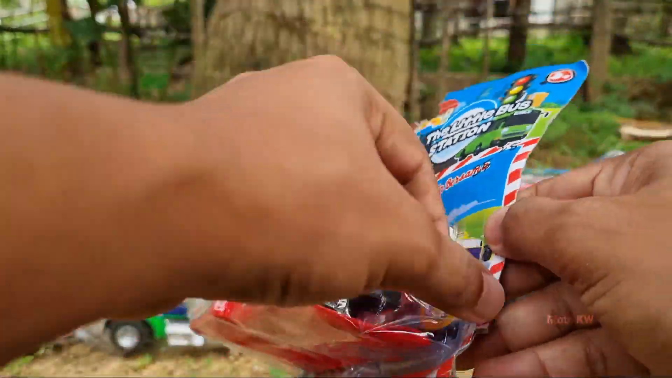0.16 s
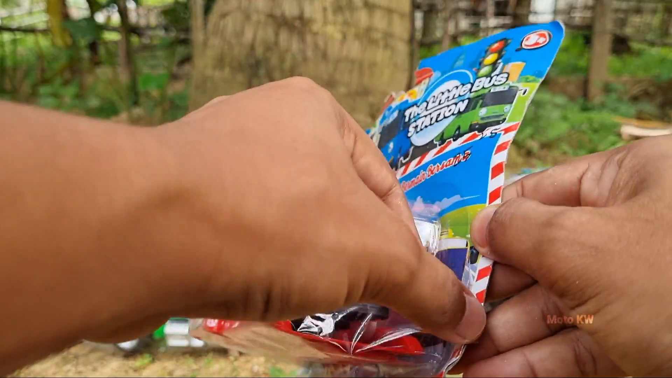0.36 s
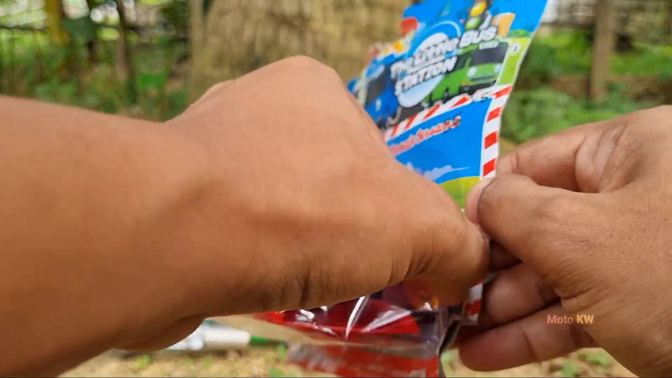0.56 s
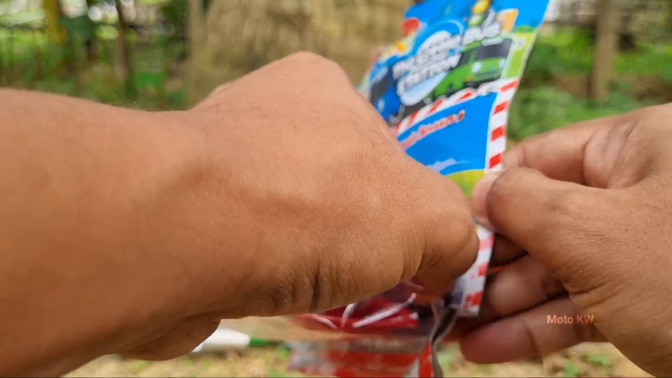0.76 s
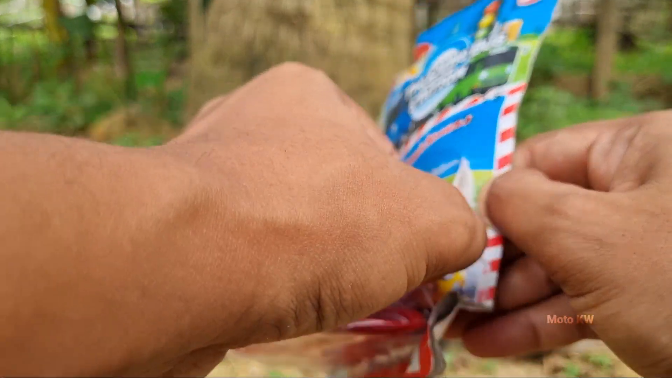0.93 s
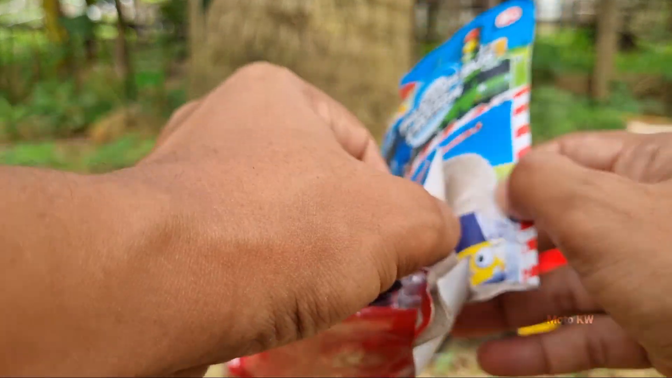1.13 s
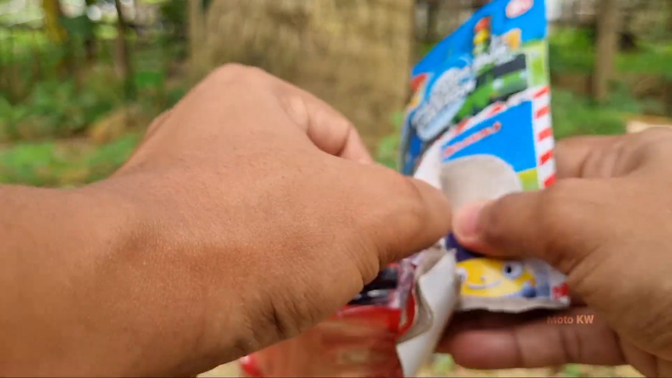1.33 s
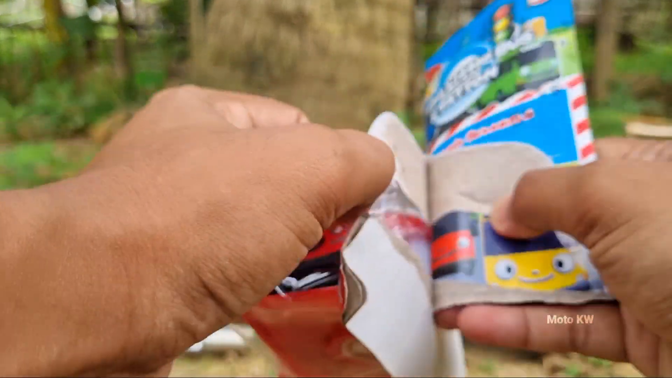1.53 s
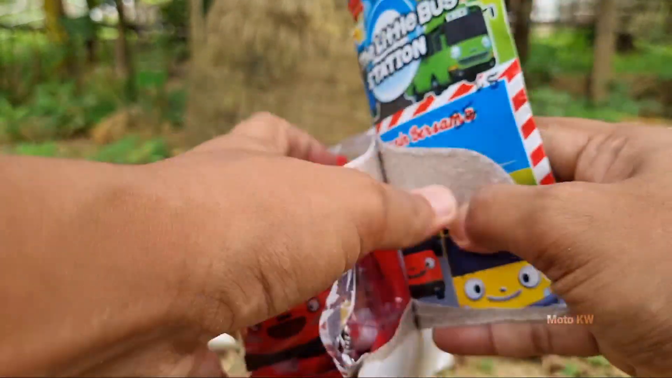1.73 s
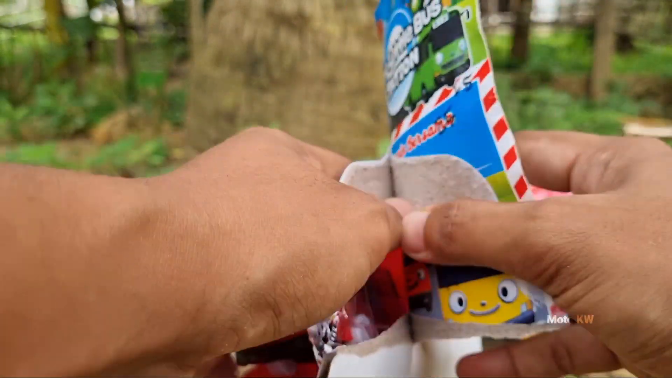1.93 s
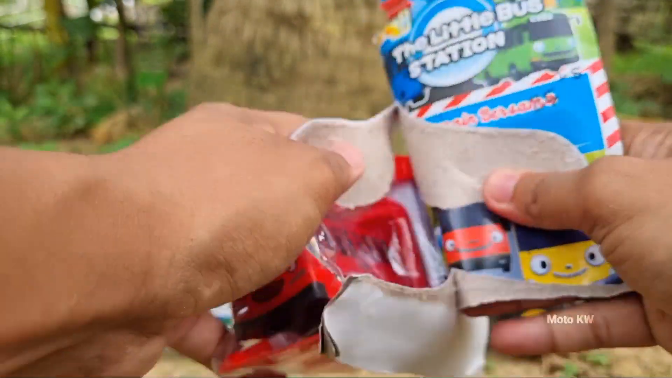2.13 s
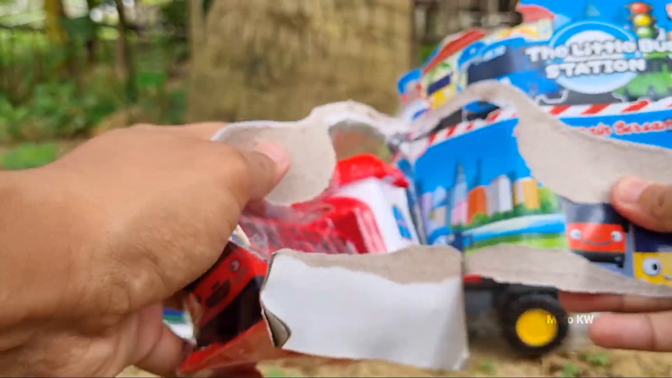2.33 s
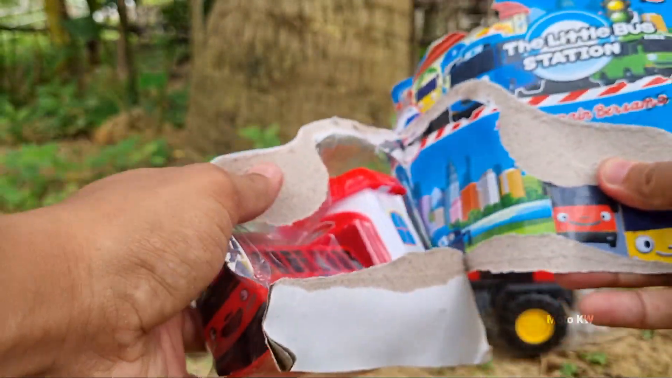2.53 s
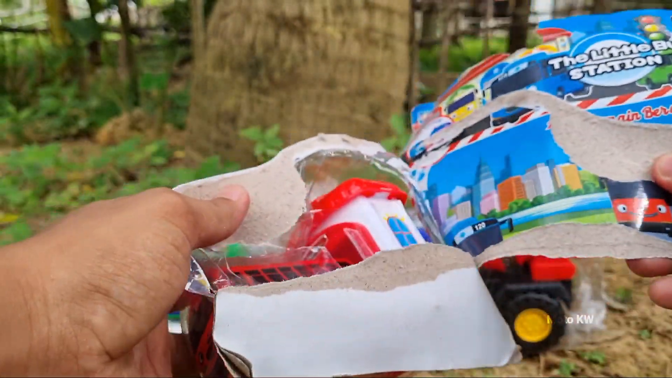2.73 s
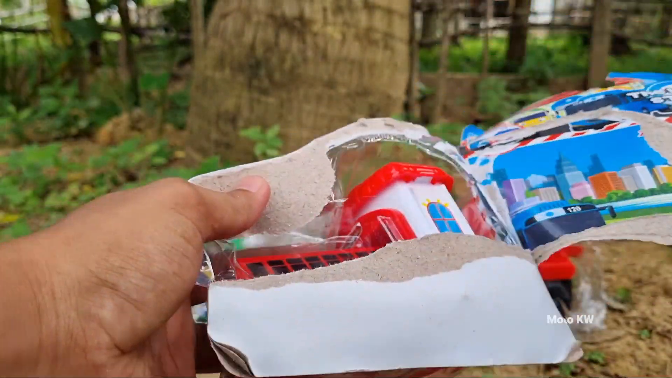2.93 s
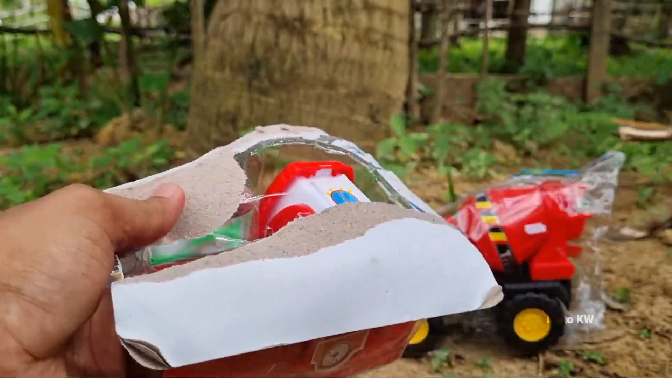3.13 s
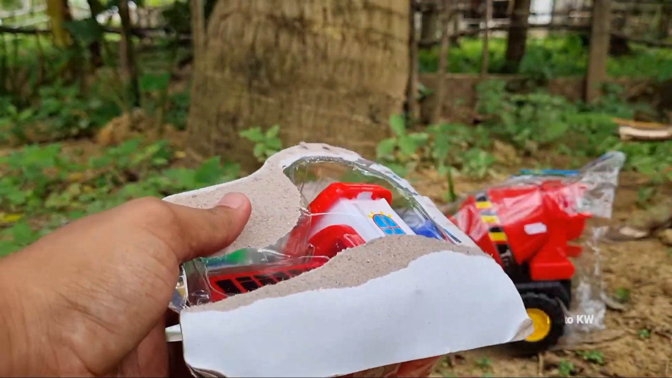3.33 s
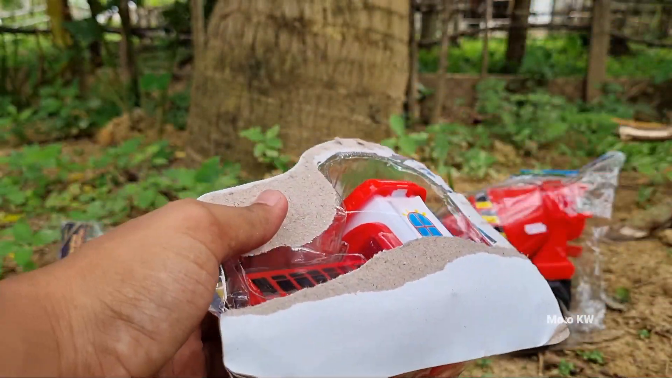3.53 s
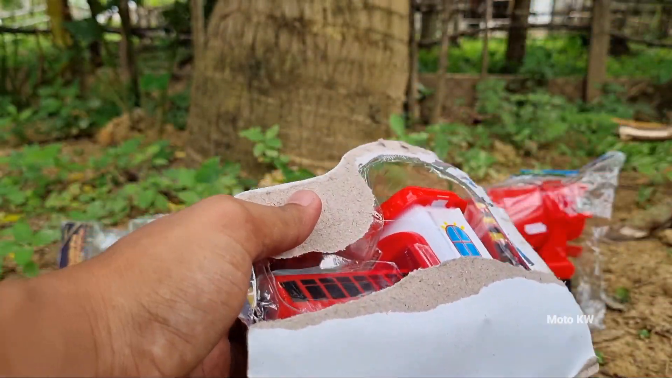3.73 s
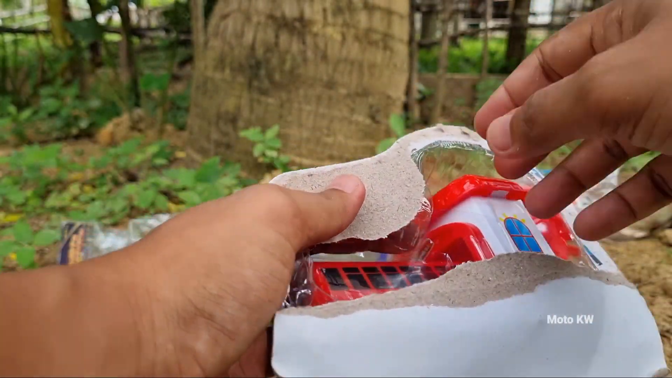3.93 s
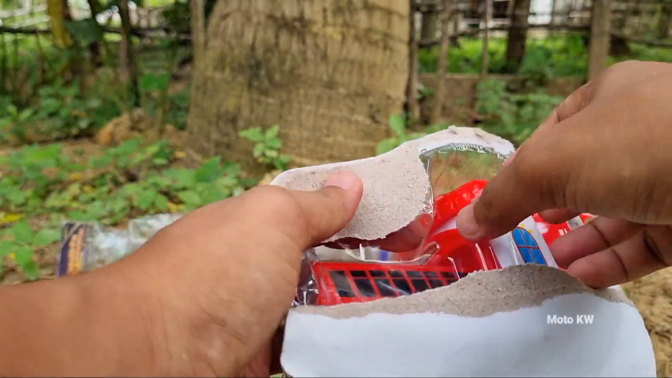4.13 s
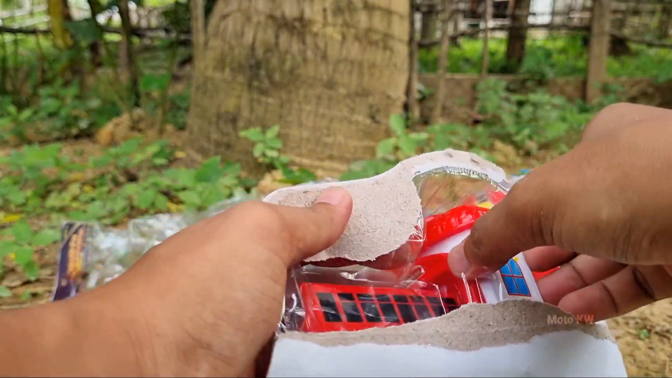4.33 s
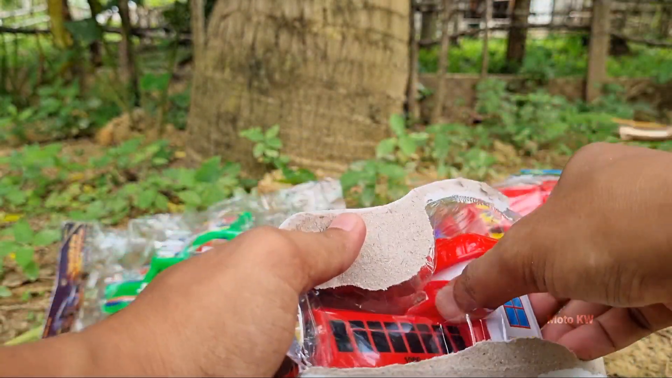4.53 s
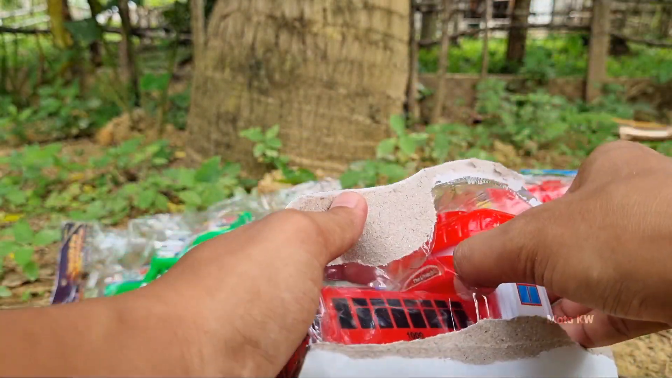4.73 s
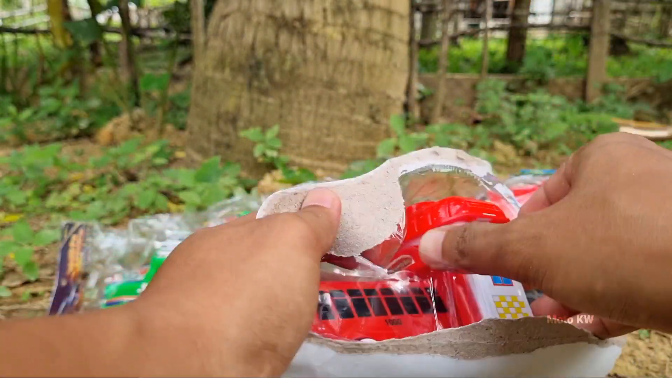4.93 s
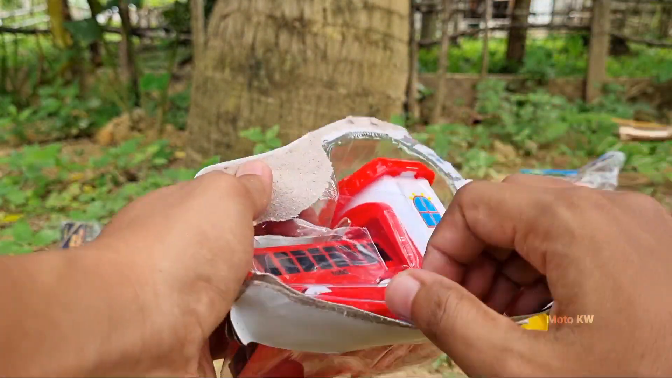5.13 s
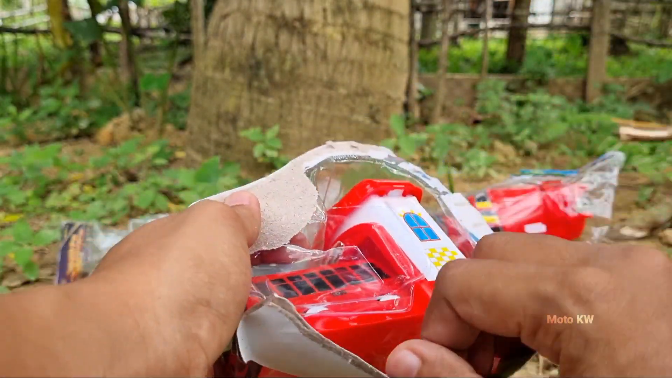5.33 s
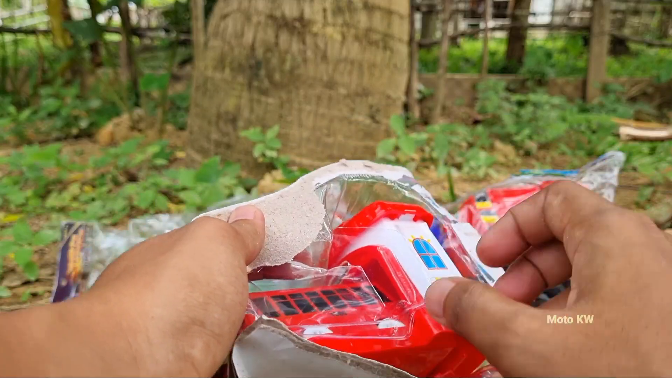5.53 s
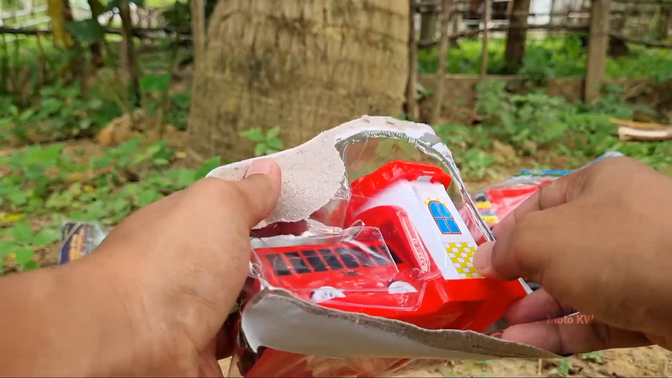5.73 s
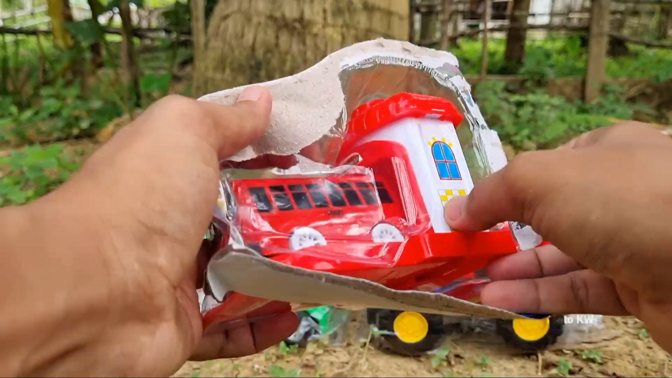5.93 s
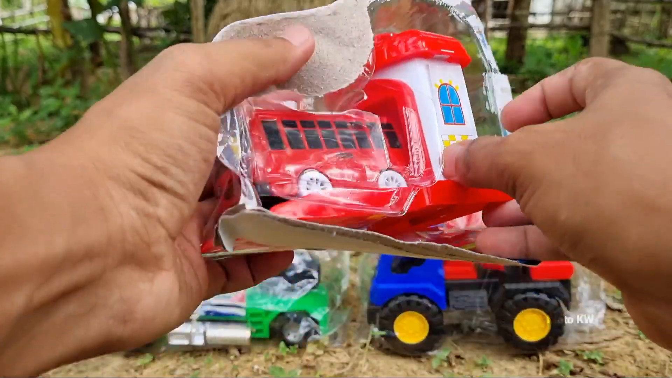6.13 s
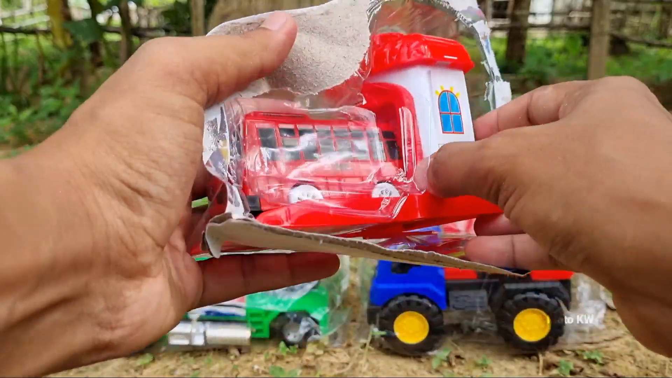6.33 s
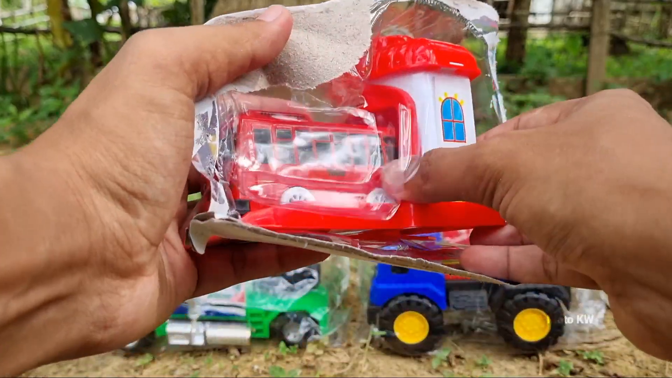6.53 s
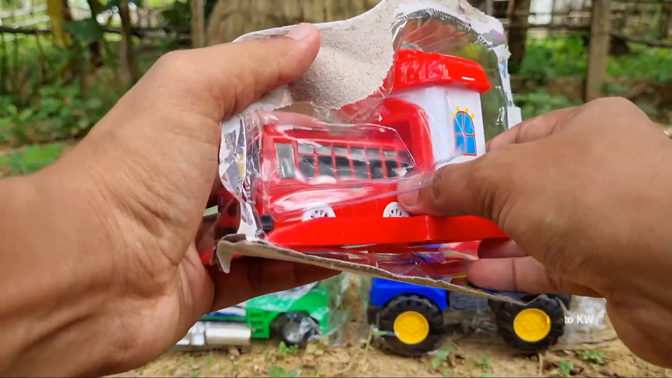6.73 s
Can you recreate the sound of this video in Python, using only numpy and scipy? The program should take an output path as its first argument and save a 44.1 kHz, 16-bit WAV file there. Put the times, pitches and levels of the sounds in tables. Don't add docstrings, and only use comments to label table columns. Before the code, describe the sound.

Outdoors, hands open a small plastic blister pack very close to a stereo microphone. Stiff film gives a few sharp snaps, then card tears in short fibrous rips amid dense crackling. The handling thins out, then grows busy again as fingers reach in and pry a toy loose, ending in creaks and snaps. Low traffic rumble, faint insect hiss and a distant engine lie behind.

```python
import sys
import numpy as np
from scipy import signal
from scipy.fft import rfft, irfft
from scipy.io import wavfile
from scipy.ndimage import uniform_filter1d, minimum_filter1d

SR = 44100
rng = np.random.default_rng(int(sys.argv[2]) if len(sys.argv) > 2 else 0)


def voltage_ratio(decibels):
    exponent = np.asarray(decibels, float) / 20
    return 10 ** exponent


def output_pcm(signal):
    pcm = np.clip(np.atleast_2d(signal).T, -1, 1) * 32767
    wavfile.write(sys.argv[1], SR, np.round(pcm).astype(np.int16))


N = 303408
TIME = np.arange(N) / SR
HZ = np.fft.rfftfreq(N, 1 / SR)


def evened(x):
    return x / np.sqrt(np.mean(x ** 2) + 1e-20)


def wandering(width):
    return evened(uniform_filter1d(uniform_filter1d(rng.standard_normal(N), width), width))


def over_time(points, t=TIME):
    return np.interp(t, *np.transpose(points))


def read(points, hz):
    f, value = np.transpose(points)
    return np.interp(np.log(hz + 1), np.log(f + 1), value)


def held_db(t, start, hold, rise, fall):
    return -rise * np.maximum(start - t, 0) - fall * np.maximum(t - start - hold, 0)


def add(mix, s, sound):
    part = mix[:, max(round(s * SR), 0):][:, :sound.shape[1]]
    part += sound[:, :part.shape[1]]


def coloured(x, points):
    level_db = np.maximum(read(points, abs(np.fft.fftfreq(2048, 1 / SR))), -100)
    log_gain = np.log(voltage_ratio(level_db))
    taps = np.fft.ifft(np.exp(np.conj(signal.hilbert(log_gain)))).real[:1024]
    return signal.oaconvolve(x, taps[None], axes=-1)[..., :x.shape[-1]]


def ports(pair, same, lead_s=0.):
    z, hz = rfft(pair), np.fft.rfftfreq(pair.shape[1], 1 / SR)
    c = np.clip(read(same, hz), -1, 1)
    right = c * z[0] + np.sqrt(1 - c ** 2) * z[1]
    right = right * np.exp(-2j * np.pi * hz * lead_s)
    return irfft(np.array([z[0], right]), pair.shape[1])


# f/Hz, likeness [-1 to 1]
AIR_LIKENESS = [(60, 0.96), (240, 0.91), (950, -0.41), (3770, -0.35), (15000, 0.78)]
# f/Hz, level/dB per Hz
AIR_SPECTRUM = [(20, -60), (40, -9), (60, 2), (95, -0.5), (125, -7.5), (200, -9), (370, -13.5),
                (450, -23.5), (2000, -31), (6000, -34), (15000, -91)]
# t/s, level/dB
TRAFFIC_SWELL = [
    (0, -3),
    (1, 3.5),
    (2, 2),
    (3, -1),
    (4, 5),
    (6.4, 4),
    (6.88, -3),
]


def air():
    insects = voltage_ratio(-34) * np.exp(-((HZ - 8100) / 410) ** 2)
    z = rfft(ports(rng.standard_normal((2, N)), AIR_LIKENESS)) * (voltage_ratio(read(AIR_SPECTRUM, HZ)) + insects)
    bass_share = 1 / (1 + (HZ / 400) ** 4)
    rumble = voltage_ratio(over_time(TRAFFIC_SWELL)) * irfft(z * bass_share, N)
    hiss = irfft(z * (1 - bass_share), N)
    return voltage_ratio([[-42.58], [-43.7]]) * evened(rumble + hiss)


# t/s, level/dB
IDLE_LEVEL = [
    (0, -54.5),
    (1.15, -48),
    (1.4, -40.5),
    (2.2, -43),
    (2.35, -61.5),
    (4.2, -44),
    (5.4, -44.5),
    (5.7, -71),
]


def engine():
    waver = 1 + 0.0124 * wandering(3000)
    speed_hz = 86.1 - 47 * np.clip(TIME - 4.89, 0, .62)
    turns = np.cumsum(speed_hz * waver) / SR
    idle = voltage_ratio(over_time(IDLE_LEVEL))
    labour = voltage_ratio(held_db(TIME, start=5.16, hold=0.34, rise=160, fall=70))
    tone = 0
    for level, orders_db in [(idle, [-6, -0.5, -11.5]), (labour, [-30])]:
        for order, db in enumerate(orders_db, 1):
            tone = tone + level * voltage_ratio(db) * np.sin(2 * np.pi * order * turns)
    return tone * voltage_ratio([[.7], [-.7]])


# t/s, peak level/dB, f/Hz
PANEL_POPS = [(0.101, -26.5, 249), (0.545, -24.5, 140), (1.605, -24, 262), (2.163, -39, 172),
              (2.263, -20, 240), (2.59, -25, 186), (3.705, -13, 382), (5.064, -18.5, 267),
              (5.424, -15.5, 220), (5.426, -10.5, 716), (0.325, -15, 663), (6.566, -19, 135)]


def pops():
    out, t = np.zeros((2, N)), np.arange(3000) / SR
    shape = (1 - np.exp(-t / 0.0018)) * voltage_ratio(-60 * t / 0.035)
    for s, peak_db, hz in PANEL_POPS:
        add(out, s, voltage_ratio([[peak_db], [peak_db - 2.5]]) * shape * np.sin(2 * np.pi * hz * t))
    return out


# f/Hz, level/dB
PACK_CAVITY = [(200, -57.5), (400, -16), (560, -3.5), (16000, -3)]


def in_pack(body):
    return coloured(body, PACK_CAVITY)


# f/Hz, likeness [-1 to 1]
NEAR_LIKENESS = [(700, 0.96), (1500, 0.67), (3000, 0.91), (6000, 0.013), (15000, 0.031)]


def near_ports(pair):
    return ports(pair, NEAR_LIKENESS, lead_s=.00007)


# t/s, level/dB
FINGER_GRIP = [
    (.7, -52),
    (1.25, -47.5),
    (2.05, -48),
    (2.9, -53),
    (3.95, -49),
    (4.2, -41.5),
    (5.4, -46),
    (5.65, -50),
    (6.35, -44),
    (6.75, -59.5),
]
# start t/s, hold/s, card body level/dB, fibre hiss level/dB
CARD_PULLS = [(0.557, .004, -40.5, -61), (0.874, 0.069, -45, -48.5), (1.013, 0.063, -35, -34),
              (1.073, 0.067, -40, -46.5), (1.371, 0.14, -35.5, -40.5), (1.633, 0.0075, -29, -41.5),
              (1.841, 0.09, -38.5, -56), (2.139, 0.068, -28, -35), (2.251, 0.053, -28, -38.5),
              (2.313, 0.064, -38, -44.5), (2.627, 0.23, -59, -52.5), (3.005, 0.049, -37, -43.5),
              (4.04, 0.031, -46, -71), (4.342, 0.016, -27, -64), (4.468, 0.02, -43, -50),
              (4.882, 0.19, -43, -59), (5.05, 0.008, -30, -65), (5.231, 0.016, -45, -40.5),
              (5.704, 0.0079, -36.5, -73), (6.16, 0.018, -33, -62), (6.46, 0.03, -34.5, -71),
              (6.616, 0.0077, -32, -39)]


def effort():
    t = np.arange(0, N + 64, 64) / SR
    grip_db = over_time(FINGER_GRIP, t)
    hiss_db = -62 + 0.58 * (grip_db - grip_db.mean())
    level = voltage_ratio([grip_db, hiss_db])
    for start, hold, *peak_db in CARD_PULLS:
        pull_db = np.c_[peak_db] + held_db(t, start, hold, rise=425, fall=540)
        level = np.hypot(level, voltage_ratio(pull_db))
    return [np.interp(TIME, t, v) for v in level]


# f/Hz, level/dB per Hz
CARD_BODY = [(300, -33.5), (550, 1), (800, -2.5), (1400, -7), (1900, -3), (3200, -9.5), (10000, -26.5)]
# f/Hz, level/dB per Hz
FIBRE_HISS = [(1000, -20), (2600, 3), (6600, 3.5), (8200, 4.5), (9600, -0.5), (12500, -3), (15200, 3),
              (15900, -34)]


def rip(breaks_per_s=1200, size_db=0.5, clump_db=2.5, smooth=0.72):
    body_gain, hiss_gain = effort()
    clumps = voltage_ratio(clump_db * wandering(150))
    ticks = voltage_ratio(5.9 * np.minimum(rng.exponential(1, N), 2)) * (rng.random(N) < 200 / SR)
    creaks = 0.36 + 0.27 * signal.lfilter([1], [1, -.99], ticks)
    sizes = voltage_ratio(size_db * np.minimum(rng.exponential(1, N), 4)) * (rng.random(N) < breaks_per_s / SR)
    breaks = evened(signal.lfilter([1], [1, -.93], sizes ** 2) ** .5)
    roughness = hiss_gain / (hiss_gain + voltage_ratio(-47))
    drive = rng.standard_normal((2, N)) * ((smooth + (1 - smooth) * breaks) * clumps) ** roughness
    body = body_gain * voltage_ratio(0.5) * evened(coloured(drive * creaks, CARD_BODY))
    hiss = hiss_gain * voltage_ratio(5.5) * evened(coloured(drive * (creaks + 6.5), FIBRE_HISS))
    return near_ports(in_pack(body) + hiss)


# t/s, level/dB
SHELL_PUSH = [
    (0, -25.5),
    (2, -9.5),
    (5.802, -12),
    (6.1, -8.5),
]


def shell(body):
    band = signal.butter(2, [170, 420], "band", fs=SR, output="sos")
    return signal.sosfilt(band, abs(body[0])) * voltage_ratio(over_time(SHELL_PUSH))


LEAD_S = .005


def slipping(t, peak_db, hz, crack_db):
    softness = peak_db / -4.5
    run_ms = 0.36 + (1.365 - 0.36) * np.clip(softness, 0, 1)
    run_ms *= (1500 / hz) ** 0.061
    u = np.maximum(t - LEAD_S, 0) / (0.0013 * max(run_ms, .25))
    onset = 1 - np.exp(-u / (0.031 + 0.12 * np.clip(softness, 0, 1.5)))
    rustle = 0.15 * voltage_ratio(held_db(t, LEAD_S, 0, 5900, 1160))
    slips = rng.standard_normal((4, len(t))) * (onset * 1.09 * np.exp(-u / 1.75) + rustle)
    jerk = 7.5 * np.clip(-crack_db / 14, 0, 1)
    slips[:, round((LEAD_S + .0009) * SR)] += jerk * np.array([0.85, 0.33, 0.28, 0.026])
    dullness = np.clip(0.12 - 0.0053 * crack_db, 0, .9)
    slips[2:] = signal.lfilter([1], [1, -dullness], slips[2:])
    return slips, u


def patch_ring(t, hz):
    place, phase = rng.random((2, 14, 1))
    modes_hz = 520 * 11 ** ((np.arange(14)[:, None] + place) / 14)
    modes_hz[0] = hz
    octaves = np.log2(modes_hz / hz)
    t60 = .008 * (1000 / modes_hz) ** .6
    level_db = -3.5 * abs(octaves) + 1.58 * octaves + 6 * (octaves == 0)
    ring = (voltage_ratio(level_db - 60 * t / t60) * np.sin(2 * np.pi * (modes_hz * t + phase))).sum(0)
    return ring * (1 - np.exp(-t * hz / 0.1)) ** 2 * np.sqrt(hz / 1000)


def snap(peak_db, hz, crack_db):
    t = np.arange(1200) / SR
    slips, u = slipping(t, peak_db, hz, crack_db)
    body = signal.fftconvolve(slips[:2], patch_ring(t, hz)[None], axes=1)[:, :len(t)]
    peak = abs(signal.hilbert(body)).max(1, keepdims=True)
    crack = voltage_ratio(peak_db + crack_db - 0.5) * slips[2:] * (0.49 + np.exp(-u / 0.55))
    return voltage_ratio(peak_db + 0.5) * body / peak, crack


# t/s, level/dB, f/Hz, crack/dB
FILM_SNAPS = [(0.108, -13, 1420, -36), (0.325, -1, 2430, -11), (0.4153, -13.5, 950, -54),
              (0.535, -17.5, 1770, -7.5), (0.546, -7.5, 1920, -8), (0.566, -15.5, 970, -40),
              (0.694, -29, 980, -7), (0.716, -42.5, 2260, 11.5), (0.778, -33, 4280, 6.5),
              (0.818, -23.5, 4030, -4), (0.826, -20, 1290, -21), (0.882, -13, 1920, -12.5),
              (0.918, -18.5, 1820, -31), (0.941, -12.5, 1040, -14), (0.972, -12, 1070, -35),
              (1.018, -21.5, 5000, 0), (1.028, -5.5, 1000, -29), (1.041, -5.5, 584, -10.5),
                 (1.047, -10, 4800, -1.5), (1.058, -25, 1740, -18), (1.081, -9.5, 1380, -5.5),
                 (1.113, -24.5, 2670, 4.5), (1.133, -26.5, 1800, 5.5), (1.173, -20.5, 3130, -11.5),
                 (1.292, -14, 1330, -45), (1.322, -23.5, 5200, -4), (1.368, -3, 2800, -10),
                 (1.404, -7, 2530, -10.5), (1.42, -13.5, 850, -6), (1.5, -8, 950, -25),
                 (1.514, -13, 795, -5), (1.576, -11.5, 2030, -19), (1.608, -4, 950, -18),
                 (1.624, -8.5, 1780, -33), (1.639, -14, 940, -2.5), (1.737, -17.5, 1610, -36),
                 (1.817, -17, 2000, 6.5), (1.835, -10, 2300, -9.5), (1.868, -9.5, 2370, -9.5),
                 (1.916, -12, 1100, -27),
              (2.024, -11, 2700, -16), (2.124, -11, 1030, -24), (2.127, -5.5, 1090, -12),
                  (2.143, -0.5, 1130, -32), (2.154, -11.5, 1710, -19), (2.178, -8.5, 1100, -11),
                  (2.187, -11.5, 4970, -0.5), (2.249, -13, 1810, -0.5), (2.27, -9.5, 1650, -8),
                  (2.303, -15, 2040, -25), (2.34, -18, 1700, -2.5), (2.405, -17, 2630, -26),
                  (2.466, -47.5, 3700, 20), (2.505, -11, 690, -13.5), (2.533, -33.5, 663, 5.5),
                  (2.573, -10.5, 1880, -10.5), (2.592, -9.5, 830, -14.5), (2.849, -25.5, 1230, -7.5),
                  (2.921, -20.5, 1090, -18), (3.04, -17, 844, -12), (3.159, -16, 1820, -6),
                  (3.205, -17.5, 1770, -31), (3.234, -16.5, 4200, -22), (3.293, -18, 2670, -15.5),
                  (3.336, -20, 880, -8.5), (3.388, -20.5, 3300, -0.5), (3.447, -45, 4450, 12.5),
              (3.707, -22, 800, -43), (3.754, -16.5, 1760, -36), (3.845, -7, 1470, -16),
               (3.953, -23.5, 1680, -34), (4.036, -10.5, 710, -11), (4.081, -13, 1320, -4.5),
               (4.105, -12, 1770, -46), (4.114, -19, 1460, -0.5), (4.186, -21.5, 1310, -11),
               (4.224, -5, 1790, -46), (4.245, -12, 2530, -11), (4.29, -9.5, 2660, -21),
               (4.319, -15.5, 3600, 0), (4.322, -7, 2270, -5.5), (4.358, -11.5, 1060, -10),
               (4.414, -10.5, 1940, -34), (4.467, -6.5, 2230, -5), (4.485, -11.5, 1240, -12),
               (4.514, -23.5, 2900, 6.5), (4.522, -23.5, 4300, 10), (4.561, -9.5, 1620, -17),
               (4.591, -2, 3100, -13.5), (4.717, -2.5, 1960, -15.5), (4.741, -22, 940, -27),
               (4.774, -14, 1200, 0.5), (4.792, -7.5, 1760, -20), (4.802, -5, 2720, -8.5),
               (4.878, -19, 1380, -28), (4.897, -17, 1070, 4.5), (4.912, -6, 3500, -31),
              (4.947, -7, 1900, -12), (4.957, -4.5, 2320, -26), (5.006, -10, 1130, -13.5),
                (5.031, -12, 750, -18), (5.068, -10, 3200, -4), (5.086, -18.5, 3050, -7),
                (5.143, -35.5, 2800, 4), (5.178, -16, 1180, 2.5), (5.187, -13, 2730, -9),
                (5.207, -6, 3580, -7.5), (5.226, -5.5, 2830, -11), (5.241, -8, 3340, -6.5),
                (5.277, -31.5, 800, 3.5), (5.313, -14, 730, -39), (5.338, -15, 1190, -52),
                (5.373, -17.5, 2800, -2), (5.425, -13.5, 640, -8.5), (5.503, -23.5, 2920, -15),
                (5.713, -20, 1820, -16), (5.75, -15.5, 1970, -38), (5.848, -18.5, 2600, -12),
                (5.919, -18, 1290, -40), (5.957, -9, 2580, -24), (5.987, -21.5, 865, -4),
              (6.033, -15, 4260, -21), (6.08, -10.5, 664, -23), (6.159, -15.5, 660, -31),
               (6.172, -5, 4900, -7.5), (6.18, -11, 720, -8), (6.25, -15, 745, -33.5),
               (6.296, -7, 1850, -3), (6.334, -13, 790, -9), (6.346, -5.5, 4500, -1.5),
               (6.366, -14.5, 2880, -0.5), (6.419, -16, 1520, -37), (6.439, -8.5, 2500, -10.5),
               (6.455, -19, 1720, 10), (6.48, -14, 2840, 4.5), (6.512, -10, 1590, -6.5),
               (6.599, -18, 4500, 8), (6.608, -11.5, 2520, 1), (6.627, -11, 620, -4),
               (6.68, -12.5, 2290, -8), (6.87, -9.5, 833, -24)]
# t/s, peak level/dB, ring f/Hz, crack level over the ring/dB
SMALL_CREASES = [(0.128, -25, 584, -34), (0.188, -27.5, 590, -25), (0.202, -32, 606, -18),
                 (0.737, -44, 931, -14), (0.768, -27, 850, -20), (0.805, -23.5, 1260, -14),
                 (0.891, -21, 1140, -23), (0.982, -21, 1000, -25), (1.058, -12.5, 1680, 0),
                 (1.166, -25, 1300, -20), (1.23, -38, 754, -22), (1.336, -27, 1320, -7),
                 (1.353, -25, 2640, -14), (1.467, -37, 738, -7), (1.482, -18, 1670, -29),
                 (1.494, -21, 880, -31), (1.554, -29, 2010, -22), (1.782, -28, 1160, -14),
                 (1.848, -17, 735, -27), (1.897, -36, 1130, -19), (1.942, -27, 1980, -11),
                 (1.978, -49, 1620, -31), (2.0, -32.5, 2720, -4), (2.082, -27, 756, -20),
                 (2.104, -26.5, 1310, 0), (2.114, -18, 1030, -36), (2.162, -11, 1080, -7),
                 (2.322, -14.5, 1060, -13), (2.394, -22, 2060, -21), (2.428, -39, 2010, -2),
                 (2.48, -27, 614, -11), (2.498, -22, 595, -28), (2.514, -30, 730, 7),
                 (2.628, -31, 926, -11), (2.648, -28, 2040, -7), (2.677, -38, 5000, 5),
                 (2.73, -35, 1310, -9), (3.01, -18, 1780, -21), (3.056, -23.5, 1070, -3),
                 (3.226, -34, 4260, -25.5), (3.431, -33.5, 1070, -30), (3.607, -34, 770, -25),
                 (3.727, -27, 1670, -11), (3.861, -19, 680, -17), (3.896, -33, 716, -10),
                 (4.021, -22, 730, -21), (4.052, -19.5, 725, -7), (4.093, -32, 1720, -17),
                 (4.135, -20, 595, -14), (4.237, -23, 930, -10),
                 (4.311, -14, 2100, -17), (4.399, -24, 1330, -25), (4.436, -20.5, 660, -26),
                      (4.493, -28, 705, 3), (4.644, -26, 1050, -15), (4.651, -25, 705, -18),
                      (4.685, -26, 947, -25), (4.83, -26, 630, -16), (4.848, -27, 700, -22),
                      (4.966, -13, 630, -15), (4.994, -27, 1190, -39), (5.043, -21, 1150, -21),
                      (5.072, -11.5, 759, -12), (5.133, -32, 641, -16), (5.155, -31, 5000, 3),
                      (5.217, -13.5, 2820, -14), (5.253, -40, 3010, -18), (5.351, -34, 700, -13),
                      (5.438, -27.5, 604, -1.5), (5.546, -26.5, 700, -28), (5.559, -32, 600, -8),
                      (5.576, -31, 660, -12), (5.672, -34, 1230, -20), (5.779, -24.5, 1330, -20),
                      (5.861, -22, 683, -16), (5.898, -33, 996, -36), (5.999, -25, 653, -14),
                      (6.059, -22, 1770, -20), (6.074, -15.5, 650, -18), (6.1, -25, 1280, -15),
                      (6.105, -25, 608, -26), (6.148, -17.5, 704, -17), (6.19, -13.5, 720, -14),
                      (6.213, -42, 1010, 1), (6.307, -21, 820, -11), (6.378, -25, 750, -4),
                      (6.411, -19, 1590, -27), (6.462, -13, 2080, -0.5), (6.49, -16, 715, -5),
                      (6.541, -47, 2190, -9), (6.584, -16.5, 1070, -25), (6.592, -17, 2300, -1),
                      (6.674, -17.5, 2320, -5.5), (6.75, -36, 2380, -17), (6.765, -45, 1010, -25),
                      (6.785, -32.5, 616, -35),
                 (1.033, -8, 2200, -6.5), (1.097, -22, 1500, -3), (1.128, -29, 4500, 3),
                 (2.167, -7, 1090, -9), (2.170, -16, 2500, -14), (2.18, -12, 1100, -11),
                 (2.191, -16, 1190, 0), (2.194, -21, 1500, -4), (2.203, -27, 2000, -13),
                 (2.279, -22, 1800, -8), (5.062, -29, 2000, -1), (5.054, -28, 1500, -12),
                 (5.285, -43, 4000, -1), (0.228, -36, 880, -23), (0.3252, -13.5, 3070, -38),
                 (0.3255, -2.5, 2050, -36), (3.708, -15, 950, -24), (5.425, -11, 474, -30)]
# t/s, peak level/dB
SETTLING_TICKS = [(1.194, -32), (2.016, -22.5), (5.39, -24), (5.5256, -30.5), (5.599, -37.5), (.196, -46),
                  (1.655, -23.5), (3.791, -33.5), (4.216, -33), (4.267, -33), (4.376, -34), (5.736, -51),
                  (6.199, -35)]
# f/Hz, level/dB per Hz
CRACK_SPECTRUM = [(1800, -8), (3200, -2), (5000, -2.5), (6500, -5.5), (8000, -1), (10000, -10.5),
                  (14000, -13), (16300, -12.5)]


def film():
    snaps = FILM_SNAPS
    small = SMALL_CREASES
    ticks = [(s, peak_db, 4000, -1.5) for s, peak_db in SETTLING_TICKS]
    body, crack = np.zeros((2, 2, N))
    for s, *crease in snaps + small + ticks:
        ring, burst = snap(*crease)
        add(body, s - LEAD_S, ring)
        add(crack, s - LEAD_S, burst)
    unit = np.sqrt((coloured(np.eye(1, 1024), CRACK_SPECTRUM) ** 2).sum())
    heard = near_ports(in_pack(body) + coloured(crack, CRACK_SPECTRUM) / unit)
    return heard + shell(body)


# f/Hz, level/dB
PORT_TILT = [(60, 3), (240, 2), (950, 3), (3770, -0.5), (15000, -2.5)]


def tilted(x):
    return irfft(rfft(x) * voltage_ratio(np.outer([.5, -.5], read(PORT_TILT, HZ))), N)


def scene():
    return air() + engine() + pops() + tilted(rip() + film())


def starved(x):
    hz, _, z = signal.stft(x, SR, nperseg=256, noverlap=192)
    band_db = 10 * np.log10(uniform_filter1d((abs(z) ** 2).mean(0), size=5, axis=0) + 1e-20)
    near_db = -minimum_filter1d(-band_db, size=25, axis=1)
    noise = uniform_filter1d(rng.standard_normal(band_db.shape), size=7, axis=0)
    patches = evened(uniform_filter1d(noise, size=5, axis=1))
    hz = hz[:, None]
    lost = (band_db < near_db - 12) & (patches > 1.3 - hz / 7000) & (hz > 3500)
    return signal.istft(z * np.where(lost, .05, 1), SR, nperseg=256, noverlap=192)[1][:, :N]


def roll_off(x):
    return signal.sosfilt(signal.butter(12, 16800, fs=SR, output="sos"), x)


def record(dry):
    low, high = (signal.firwin(511, hz, window=("kaiser", 7), fs=SR) for hz in (15550, 16500))
    edge = low + voltage_ratio(-23) * (high - low)
    overloaded = np.tanh(dry * 1.012) / 0.88
    mix = starved(signal.oaconvolve(overloaded, edge[None], "same"))
    return roll_off(mix)


dry = scene()
out = record(dry)
output_pcm(out)
```